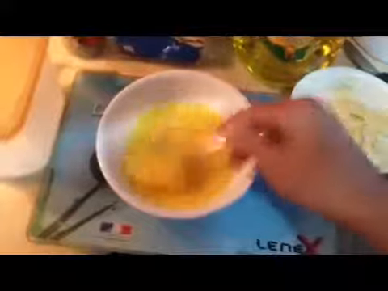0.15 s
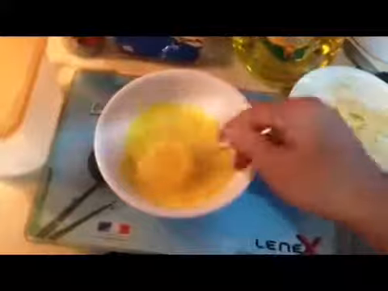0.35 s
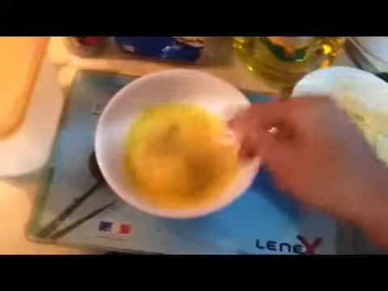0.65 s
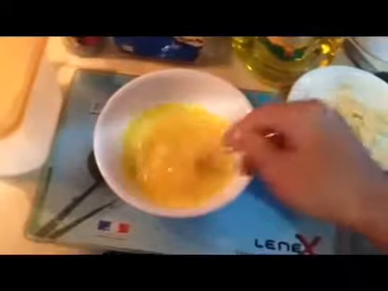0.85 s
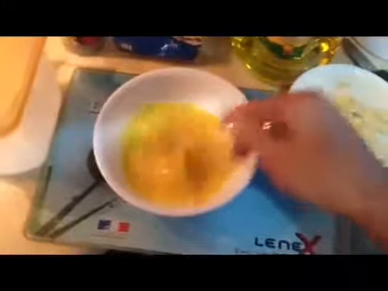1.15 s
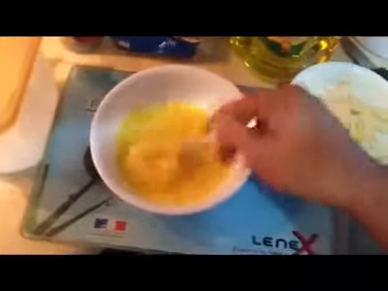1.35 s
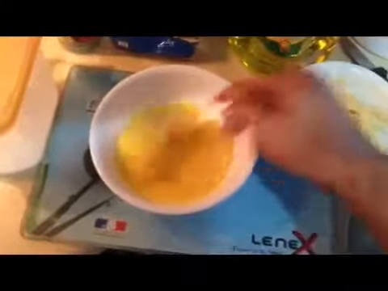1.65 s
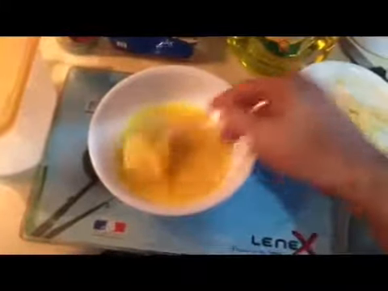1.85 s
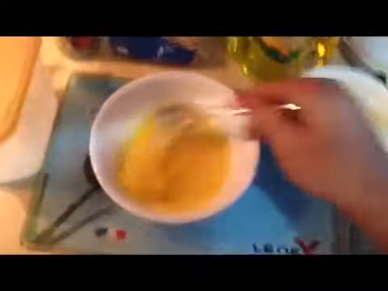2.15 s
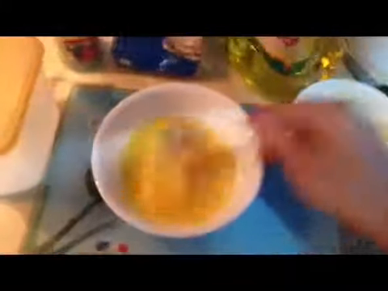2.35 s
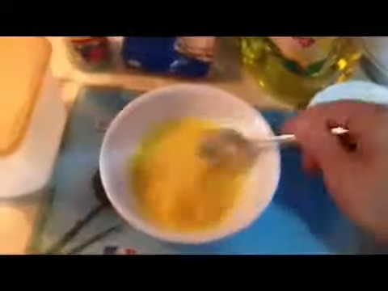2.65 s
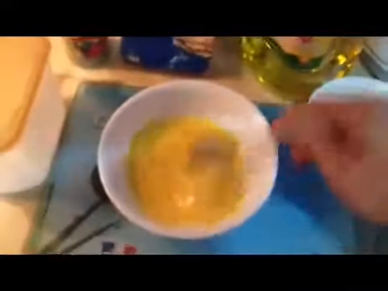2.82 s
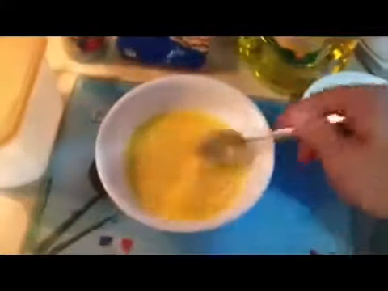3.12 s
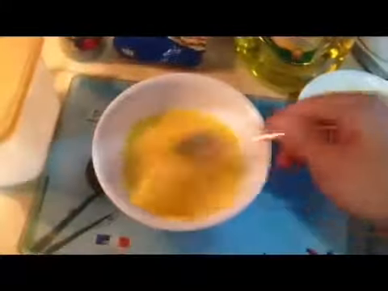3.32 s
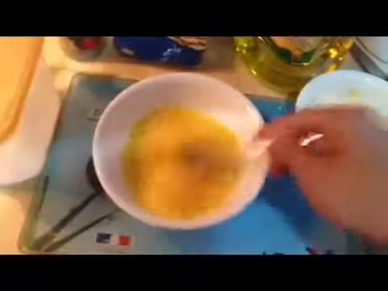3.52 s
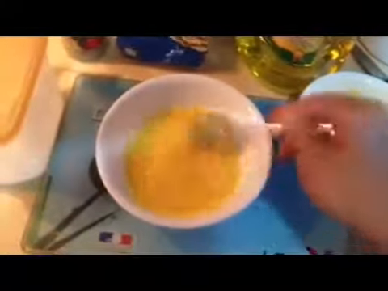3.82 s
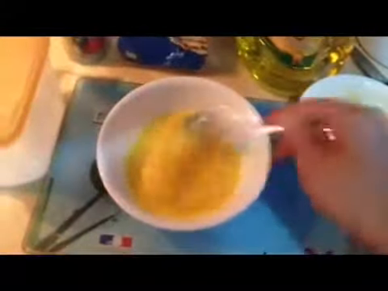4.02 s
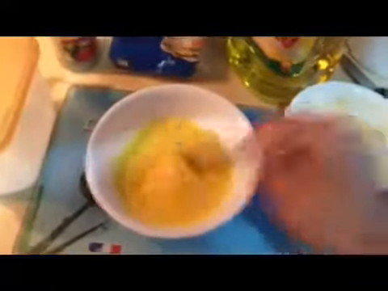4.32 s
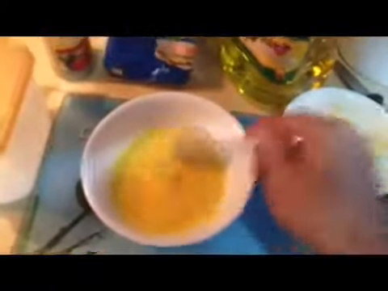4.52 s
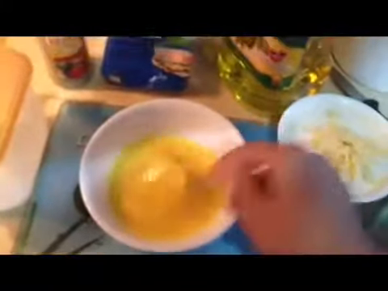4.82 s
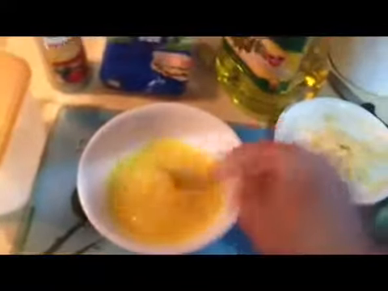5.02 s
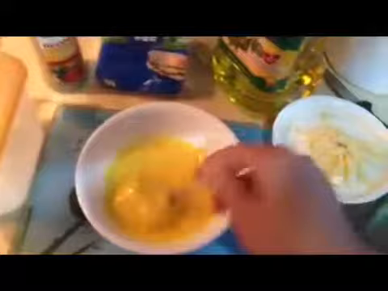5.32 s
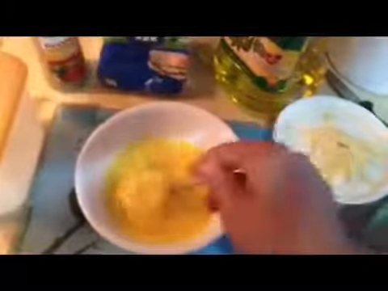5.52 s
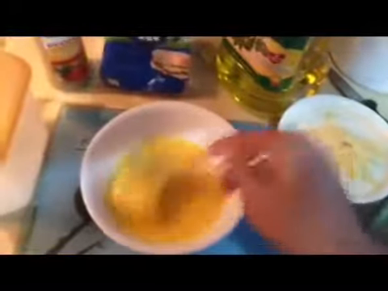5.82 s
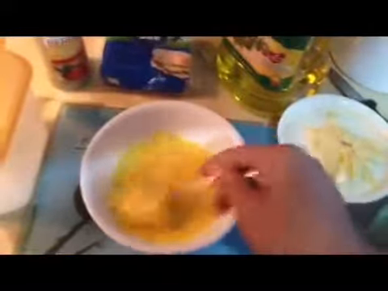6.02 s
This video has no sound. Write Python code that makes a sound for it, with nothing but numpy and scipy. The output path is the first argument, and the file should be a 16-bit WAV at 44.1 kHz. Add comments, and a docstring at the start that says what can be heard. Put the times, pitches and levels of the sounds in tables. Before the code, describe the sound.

Close up in a small, hard kitchen, a metal fork beats eggs in a ceramic bowl at about four strokes a second. Each stroke swishes wetly, then knocks sharply on the damped wall, with small rebounds, froth crackle and liquid plops. Around the middle, two strokes catch the rim and ring brightly. The beating never stops; faint hiss and hum lie beneath.

```python
"""A knock dies away over faint hiss and hum; a fork goes on beating eggs in a ceramic bowl, about four strokes a second.
Each stroke swishes (gliding noise band) and knocks on the egg-damped wall (struck modes plus noise clatter).
Grazes and rebounds are lighter knocks; plops are rising sines, froth is ringing clicks, wash is grainy noise.
Twice the free rim is caught: it rings in undamped modes and the bowl rocks. A small hard room answers in noise echoes."""
import sys
import numpy as np
from scipy import signal
from scipy.fft import rfft, irfft
from scipy.io import wavfile
from scipy.ndimage import uniform_filter1d, minimum_filter1d, map_coordinates

SR = 44100
rng = np.random.default_rng(int(sys.argv[2]) if len(sys.argv) > 2 else 0)


def materialize(psi):
    """Save the field psi as 16-bit PCM at rate SR to the path in sys.argv[1].

    A 1-D psi becomes a single channel; in a 2-D psi each row is a channel.
    """
    bounded = np.clip(np.atleast_2d(psi).T, -1, 1)
    quanta = np.round(bounded * 32767).astype(np.int16)
    wavfile.write(sys.argv[1], SR, quanta)


N = 271656
LEAD = SR // 10   # samples before time zero, so that a knock can already be dying away
SPAN = N + LEAD

# Levels are relative within each table unless noted.
# steady hiss spectrum: pitch_hz, density_db_per_hz
HISS = [(25, -28.5), (60, -23), (110, -7), (150, -2), (190, -4.5), (280, 1.5), (420, -5.5), (1150, -13.5),
        (1650, -4.5), (1880, 2), (2150, -11.5), (4500, -16.5), (7500, -20.5), (15000, -28.5)]
# appliance hum: pitch_hz, rms_db
HUM = [(97, -80.5), (146, -75), (294, -73), (368, -86.5)]
# wall knocks, each after a swish: start_s, level_db, brightness_db_per_register, click_hz, swish_db
STROKES = [(-0.045, -24, -2, 2980, -33), (0.1897, -26.5, 0.7, 7420, -39.5), (0.4157, -25.5, 0, 5870, -35),
           (0.6782, -22, 0.65, 2530, -31), (0.9174, -19, -1.1, 4690, -33.5), (1.175, -22, 0.1, 4740, -38),
           (1.4102, -24, 1.1, 3070, -31), (1.6515, -30, 1.7, 5000, -37), (1.8719, -24, 0.2, 2240, -33),
           (2.104, -21, 1.5, 2390, -30.5), (2.3592, -24, 1, 6820, -38), (2.5943, -21.5, 0.5, 5160, -35),
           (2.8169, -20.5, -3.5, 3220, -37), (3.0171, -20.5, 2.3, 6320, -34),
           (3.285, -19.5, 0, 6810, -30.5), (3.5326, -31.5, -4.5, 4520, -48.5),
           (3.7551, -26.5, -0.7, 3970, -31.5), (3.9849, -22, -1, 4690, -36),
           (4.2272, -21.5, -0.8, 5880, -36), (4.4592, -24.5, -0.3, 2840, -46.5),
           (4.6867, -20.5, 0.6, 4290, -35.5), (4.9079, -21, 0.1, 2445, -32.5),
           (5.1474, -21, 0.6, 4110, -35.5), (5.381, -22, 0.3, 3500, -35), (5.606, -22, 0.6, 4470, -34),
           (5.829, -24, 1.6, 3220, -30), (6.0588, -24, 1, 2550, -43)]
# registers of a knock: low_hz, high_hz, clatter_t60_s, clatter_db (against the bowl's modes)
REGISTERS = [(1358, 1895, 0.013, 4), (1790, 3990, 0.025, 11.5), (4290, 7200, 0.019, 6.5),
             (8060, 13200, 0.017, 14)]
# egg-damped wall modes, balanced within a register: pitch_hz, level_db, t60_s
WALL = [(1309, -2, 0.05), (1595, 8.5, 0.062), (1865, -8.5, 0.037), (2135, -3, 0.0073), (2640, -4.5, 0.044),
        (2740, -9, 0.014), (3368, 5.5, 0.03), (3690, -5.5, 0.03), (4040, 15.5, 0.0074), (4830, 14.5, 0.021),
        (5760, -37, 0.018), (6530, -2, .02), (6880, 8.5, 0.0063), (9000, 19, 0.047), (10240, 16.5, 0.056),
        (13120, -31.5, 0.027)]
# low thud of the bowl's own body modes: pitch_hz, level_db, t60_s
THUD = [(250, -23, 0.065), (480, -28, 0.068), (596.4, -21, 0.044)]
# room reverberation: pitch_hz, level_db, t60_s
KITCHEN = [(150, -8, 0.33), (594, -11, 0.067), (1530, -10, 0.26), (2870, -11.5, 0.23), (5540, -16.5, 0.2),
           (9000, -14, 0.081), (15000, -23.5, 0.54)]
# tine tips grazing the wall: start_s, level_db, click_hz
GRAZES = [(0.1748, -46, 2290), (0.6577, -44.5, 4650), (1.3775, -38, 3690), (1.401, -34.5, 2820),
          (1.6623, -35.5, 2400), (1.8894, -31.5, 2030), (2.3381, -52, 7200), (2.5718, -36, 3400),
          (2.7982, -39, 6570), (3.4803, -49.5, 2410), (5.578, -51, 4800)]
# rebounds of the fork, mostly dull and hollow, with one harder and brighter off the rim:
# start_s, level_db, brightness_db_per_register
REBOUNDS = [(0.2324, -37, -4), (1.4482, -26, -5), (1.6809, -27, -6), (1.9042, -25, -4.5),
            (2.1565, -30.5, -5.5), (3.0412, -22.5, -1.5), (3.562, -45, -9.5), (3.8033, -40, -5.5),
            (4.26, -43, -2), (4.9664, -47, -10.5), (5.6414, -45.5, -7.5), (5.8609, -30, -4.5),
            (6.1086, -32.5, -5)]
# colour of a full knock, a graze, a rebound: level_db in each register, low to high
KNOCK_COLOUR_DB = [-1, -1, -0.5, -3.5]
GRAZE_COLOUR_DB = [-16.5, -1.5, -1, -3]
REBOUND_COLOUR_DB = [-1.5, -2.5, 1, -5]
# air pockets closing in the egg: start_s, pitch_hz, level_db
PLOPS = [(.958, 1900, -21), (1.158, 1725, -28), (1.159, 419, -43), (1.177, 250, -48), (1.189, 337, -44.5),
         (1.378, 2240, -29.5), (1.383, 361, -45), (3.48, 2420, -29), (3.695, 2080, -42), (4.262, 1875, -22),
         (4.487, 1013, -26.5), (4.492, 722, -38), (4.704, 890, -33)]
# decay of a pocket; the big deep ones ring longest: pitch_hz, t60_s
PLOP_RING = [(400, 0.31), (750, 0.023), (2200, 0.042)]
# blows on the free rim: start_s, level_db, longest_t60_s (fork contact), favoured_hz (spot struck)
RIM_BLOWS = [(3.0178, 2.5, 1.1, 4795), (3.2877, 3.5, 0.355, 3040)]
# free rim modes, close pairs beat: pitch_hz, level_db, t60_s
RIM = [(1634, -37, .7), (1648, -35, .75), (3052, -30, .38), (3063, -34, .3), (3905, -40, .19),
       (4787, -32, .28), (4803, -35, .2), (6768, -30, .3), (6810, -6, .045), (6845, -29, .22),
       (9118, -30, .2), (11590, -37, .2), (12885, -37, .13), (14265, -39, .18), (14370, -31, .09)]

REGISTER_LOG_HZ = np.log([np.sqrt(low * high) for low, high, *_ in REGISTERS])
CLICK_LIFT_DB = 2   # the register that holds the click pitch stands out
REBOUND_CLICK_HZ = 3630   # shared by all rebounds
HOLLOW_HZ, HOLLOW_AT_DB = 1667, -27   # a full knock's hollow note at this lowest-register level
HOLLOW_OCTAVES_PER_DB, HOLLOW_MAX_HZ = -0.014, 1850


def from_db(db):
    """Decibels to amplitude."""
    return 10 ** (np.asarray(db) / 20)


def rms_one(x):
    """Scales to rms 1."""
    return x / np.sqrt(np.mean(x ** 2) + 1e-20)


def unit_knock(x):
    """Scales each row to the energy of 12 ms at rms 1."""
    energy = np.sum(x ** 2, -1, keepdims=True)
    return x / np.sqrt(energy / (.012 * SR) + 1e-20)


def band(x, low_hz, high_hz, order=2):
    """Butterworth band-pass."""
    edges_hz = [low_hz, min(high_hz, SR / 2 - 1000)]
    return signal.sosfilt(signal.butter(order, edges_hz, "band", fs=SR, output="sos"), x)


def high_pass(x, cutoff_hz):
    """Second-order Butterworth high-pass."""
    return signal.sosfilt(signal.butter(2, cutoff_hz, "high", fs=SR, output="sos"), x)


def dying(t, t60):
    """Exponential decay, 60 dB in t60 seconds."""
    return from_db(-60 * t / t60)


def resonate(x, hz, t60):
    """A mode that a unit click sets ringing at height 1."""
    radius = dying(1 / SR, t60)
    angle = 2 * np.pi * hz / SR
    return signal.lfilter([.5, 0, -.5], [1, -2 * radius * np.cos(angle), radius ** 2], x + 1e-18)


def at_hz(rows, hz, axis=1):
    """Reads a column of a spectrum table on a log-frequency axis."""
    rows = np.array(rows)
    return np.interp(np.log(hz), np.log(rows[:, 0]), rows[:, axis])


def place(times, sounds):
    """Lays one short sound at each time."""
    out = np.zeros(SPAN + SR)
    for start_s, sound in zip(times, sounds):
        i = max(LEAD + round(start_s * SR), 0)
        out[i:i + len(sound)] += sound
    return out[:SPAN]


def background(level_db=-57.5):
    """Shaped noise hiss with humps near 280 Hz and 1.9 kHz, and a low hum of steady sines."""
    bins_hz = np.maximum(np.fft.rfftfreq(N, 1 / SR), 1)
    spectrum = rfft(rng.standard_normal(N)) * from_db(at_hz(HISS, bins_hz))
    hiss = rms_one(irfft(spectrum, N))
    t = np.arange(N) / SR
    hum = sum(from_db(db) * np.sqrt(2) * np.sin(2 * np.pi * (hz * t + rng.random())) for hz, db in HUM)
    return from_db(level_db) * hiss + hum


def nearest_register(hz):
    """Index of the register whose centre is nearest in log frequency."""
    return np.argmin(abs(REGISTER_LOG_HZ - np.asarray(np.log(hz))[..., None]), axis=-1)


def register_levels(db, brightness_db, click_hz, colour_db):
    """dB per register: strength, colour, a tilt for hardness and a lift around the click pitch."""
    steps = np.arange(len(REGISTERS))
    tilt_db = np.outer(brightness_db, steps - steps.mean())
    holds_click = nearest_register(click_hz)[:, None] == steps
    return db[:, None] + np.array(colour_db) + tilt_db + CLICK_LIFT_DB * holds_click


def hollow_pitch(levels_db, hz):
    """The bowl's hollow note sinks as the knock gets firmer."""
    octaves = HOLLOW_OCTAVES_PER_DB * (levels_db[:, 0] - HOLLOW_AT_DB)
    return np.minimum(hz * 2 ** octaves, HOLLOW_MAX_HZ)


def wall_modes(force, detune):
    """The struck wall rings in short modes, grouped by register."""
    count = len(force)
    pitch = 1 + detune * rng.standard_normal(count)   # the sloshing egg loads the wall differently each time
    walls = np.zeros((len(REGISTERS), *force.shape))
    for m, (hz, db, t60) in enumerate(WALL):
        strength = from_db(db + rng.normal(0, 1.2, (count, 1))) * (-1) ** m
        ringing = np.array([resonate(f, hz * p, t60) for f, p in zip(force, pitch)])
        walls[nearest_register(hz)] += strength * ringing
    return walls


def knocks(times, levels_db, hollow_hz, click_hz, chatter_db=-22, chatter_t60=0.012, second_db=-7, second_hz=3500,
           detune=0.015, skirt_hz=1220, spot_db=-1, spot_t60=0.024, thud_low_hz=190, thud_db=-2.0):
    """Steel meets ceramic: a click, a brief chatter of the tines, then a duller second contact a few ms later."""
    count, t = len(times), np.arange(SR // 10) / SR
    force = from_db(chatter_db) * rng.standard_normal((count, len(t))) * dying(t, chatter_t60)
    force[:, 0] += 1
    lags = (rng.uniform(0.0032, .0055, count) * SR).astype(int)
    walls = wall_modes(force, detune)
    out = 0
    for k, (low, high, t60, clatter_db) in enumerate(REGISTERS):
        clatter = band(rng.standard_normal((count, len(t))) * dying(t, t60), low, high, order=3)
        first = unit_knock(walls[k]) + from_db(clatter_db) * unit_knock(clatter)
        for spot_hz in (hollow_hz, click_hz):   # the spot struck favours one hollow and one bright resonance
            voice = np.array([resonate(f, hz, spot_t60) for f, hz in zip(force, spot_hz)])
            inside = nearest_register(spot_hz) == k
            first = unit_knock(first) + from_db(spot_db) * inside[:, None] * unit_knock(voice)
        second_gain = from_db(second_db) / np.sqrt(1 + (low / second_hz) ** 4)
        second = np.array([np.pad(row, (lag, 0))[:len(t)] for row, lag in zip(first, lags)])
        out = out + from_db(levels_db[:, [k]]) * unit_knock(first + second_gain * second)
    out = high_pass(out, skirt_hz)   # so small a bowl radiates little below its wall modes
    thud = sum(from_db(levels_db[:, :1] + db + thud_db) * resonate(force, hz, t60) for hz, db, t60 in THUD)
    return place(times, out + high_pass(thud, thud_low_hz))


def strokes(gain_db=0.5):
    """The main knock of each turn of the wrist."""
    times, db, brightness_db, click_hz, _ = np.transpose(STROKES)
    levels_db = register_levels(db + gain_db, brightness_db, click_hz, KNOCK_COLOUR_DB)
    return knocks(times, levels_db, hollow_pitch(levels_db, HOLLOW_HZ), click_hz)


def wash(share_db=-15, t60=0.23, build_s=0.018, low_hz=1400, high_hz=6000, grain_db=4):
    """Egg flung by each stroke falls back in a short grainy wash, louder after a harder stroke."""
    rows, t = np.array(STROKES), np.arange(SR // 4) / SR
    lumps = rms_one(uniform_filter1d(rng.standard_normal((len(rows), len(t))), size=120, axis=1))
    grains = rng.standard_normal(lumps.shape) * from_db(grain_db * lumps)
    spray = rms_one(band(grains, low_hz, high_hz))
    envelope = dying(t, t60) * (1 - np.exp(-t / build_s))
    effort_db = rows[:, [1]]
    return place(rows[:, 0], from_db(effort_db + share_db) * spray * envelope)


def froth(level_db=-63, idle_per_s=150, idle_db=-15, stroke_per_s=700):
    """Tiny bubbles and strands of egg snap, densest and loudest as the fork dives in before a knock."""
    times = np.array(STROKES)[:, 0]
    diving = place(times - .024, [np.hanning(SR // 40)] * len(times))
    born = rng.random(SPAN) < (idle_per_s + stroke_per_s * diving) / SR
    snaps = born * from_db(2 * rng.exponential(1, SPAN) + idle_db * (1 - diving))
    pitches_hz = np.geomspace(1800, 11000, 12)
    dealt = rng.integers(0, 12, SPAN)   # pitch index of each snap
    ringing = sum(resonate(snaps * (dealt == k), hz, 14 / hz) for k, hz in enumerate(pitches_hz))
    return from_db(level_db) * rms_one(ringing)


def reflections(count, build_s=0.0068):
    """Dense echoes from counter and walls, one pattern per row; each half-octave has its own decay."""
    t, response = np.arange(SR // 3) / SR, 0
    edges_hz = 100 * 2 ** np.arange(0, 8, .5)
    white = rng.standard_normal((2, count, len(t)))
    for k, (low, high) in enumerate(zip(edges_hz, edges_hz[1:])):
        hz = np.sqrt(low * high)
        envelope = dying(t, at_hz(KITCHEN, hz, axis=2)) * (1 - np.exp(-(t / build_s) ** 2))
        gain = from_db(at_hz(KITCHEN, hz)) / np.linalg.norm(envelope)
        response = response + band(white[k % 2], low, high) * gain * envelope
    return response


def kitchen(x):
    """Hand and fork move about, so every stroke meets the room with a new pattern of echoes."""
    cuts = LEAD + (np.array(STROKES)[1:, 0] * SR).astype(int) - SR // 16
    pieces = np.split(x, cuts)
    wet = [signal.fftconvolve(piece, echoes) for piece, echoes in zip(pieces, reflections(len(pieces)))]
    return place((np.r_[0, cuts] - LEAD) / SR, wet)


def swishes(gain_db=5, rise_s=0.0053, fall_s=0.015, start_hz=2100, end_hz=2800, width_hz=450):
    """The fork drags an air pocket through the egg; it shrinks, rising in pitch and level up to the knock."""
    times, *_, swish_db = np.transpose(STROKES)
    t = np.arange(-SR // 25, SR // 50) / SR   # zero at the knock
    white = rng.standard_normal((len(times), len(t), 2)) @ [1, 1j]
    flutter = signal.sosfilt(signal.butter(2, width_hz, fs=SR, output="sos"), white)
    spread = from_db(rng.normal(0, 1.0, (len(times), 1)))   # pitch factor of each swish
    hz = np.interp(t, [-.02, 0], [start_hz, end_hz]) * spread
    carrier = np.exp(2j * np.pi * np.cumsum(hz, 1) / SR)
    pocket = rms_one((flutter * carrier).real)
    envelope = np.exp(np.minimum(t / rise_s, -t / fall_s))
    return place(times + t[0], from_db(gain_db + swish_db[:, None]) * pocket * envelope)


def grazes(gain_db=-1, hollow_hz=1850):
    """Tine tips give light, thin ticks that barely wake the bowl."""
    times, db, click_hz = np.transpose(GRAZES)
    levels_db = register_levels(db + gain_db, np.zeros(len(times)), click_hz, GRAZE_COLOUR_DB)
    return knocks(times, levels_db, np.full(len(times), hollow_hz), click_hz,
                  chatter_db=-35.0, chatter_t60=0.004, second_db=-8.0)


def rebounds(gain_db=-1, hollow_hz=1470):
    """Rebounds of the fork hardly chatter: mostly dull and hollow, one harder and brighter off the rim."""
    times, db, brightness_db = np.transpose(REBOUNDS)
    click_hz = np.full(len(times), REBOUND_CLICK_HZ)
    levels_db = register_levels(db + gain_db, brightness_db, click_hz, REBOUND_COLOUR_DB)
    return knocks(times, levels_db, hollow_pitch(levels_db, hollow_hz), click_hz, chatter_db=-36.5,
                  chatter_t60=0.0044, second_db=-10.0, spot_db=-1, spot_t60=.02, thud_db=2.5)


def plops(glide_per_s=0.98, rough_rad=0.4, gulp_rough_rad=0.76, attack_s=0.00064):
    """Thick liquid damps a bubble quickly; its pitch rises a little, and big pockets wobble more."""
    times, hz, db = np.transpose(PLOPS)
    t, t60 = np.arange(SR // 6) / SR, at_hz(PLOP_RING, hz)
    wobble = rms_one(uniform_filter1d(rng.standard_normal((len(times), len(t))), size=220, axis=1))
    depth = np.interp(hz, [400, 1500], [gulp_rough_rad, rough_rad])[:, None]
    phase = 2 * np.pi * hz[:, None] * t * (1 + glide_per_s * t)
    tone = np.sin(phase + depth * wobble)
    envelope = dying(t, t60[:, None]) * (1 - np.exp(-t / attack_s))
    return place(times, from_db(db)[:, None] * tone * envelope)


def rim(waver=0.0025, slosh_hz=9, spot_db=1.5, spot_width_hz=500):
    """Above the egg the bowl is undamped and rings like a bell; the sloshing egg makes its pitch waver."""
    out = 0
    for start_s, db, longest_s, spot_hz in RIM_BLOWS:
        click = np.r_[from_db(db), np.zeros(SR - 1)]
        ring = 0
        for m, (hz, mode_db, t60) in enumerate(RIM):
            favour_db = spot_db * np.exp(-((hz - spot_hz) / spot_width_hz) ** 2)
            strength = (-1) ** m * from_db(mode_db + favour_db)
            ring = ring + strength * resonate(click, hz, min(t60, longest_s))
        speed = 1 + waver * np.sin(2 * np.pi * (slosh_hz * np.arange(SR) / SR + rng.random()))
        read_at = np.cumsum(speed) - speed[0]
        out = out + place([start_s], [map_coordinates(ring, [read_at], order=5)])
    return out


def rocking(thud_db=-45.0, ring_s=0.1, low_hz=230, high_hz=680):
    """A blow on the rim rocks the bowl on its foot: a soft, low rattle against the board."""
    times, db, *_ = np.transpose(RIM_BLOWS)
    t = np.arange(SR // 6) / SR
    rattle = band(rng.standard_normal((len(times), len(t))) * dying(t, ring_s), low_hz, high_hz, order=3)
    foot_hz, _, foot_t60 = THUD[-1]
    foot = resonate(rattle, foot_hz, foot_t60)
    return place(times, from_db(db[:, None] + thud_db) * unit_knock(unit_knock(rattle) + unit_knock(foot)))


def scene(rim_room_db=-4):
    """Bowl and egg sound in the kitchen, over its steady background."""
    bowl = strokes() + rebounds() + grazes() + rocking()
    egg = swishes() + plops() + froth() + wash()
    ringing = rim()
    ringing_room = from_db(rim_room_db) * signal.fftconvolve(ringing, reflections(count=1)[0])[:SPAN]
    sound = bowl + egg + kitchen(bowl + egg) + ringing + ringing_room
    return (sound[LEAD:] + background())[None]


def record(dry, ceiling=.97, window=45, bass_hz=50, top_hz=16000):
    """A fast limiter (window in samples) holds the loudest peaks; the deep bass and the top are cut."""
    allowed = np.minimum(1, ceiling / (abs(dry) + 1e-9))
    gain = uniform_filter1d(minimum_filter1d(allowed, size=window), size=window)
    thin = high_pass(dry * gain, bass_hz)
    return signal.sosfilt(signal.ellip(10, .1, 95, top_hz, fs=SR, output="sos"), thin)


dry = scene()
out = record(dry)
materialize(out)
```